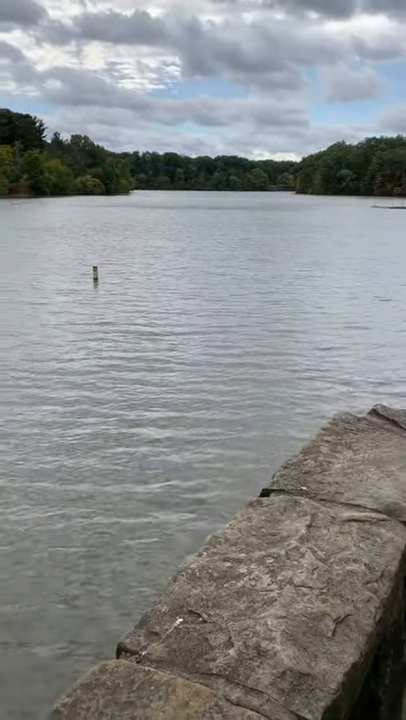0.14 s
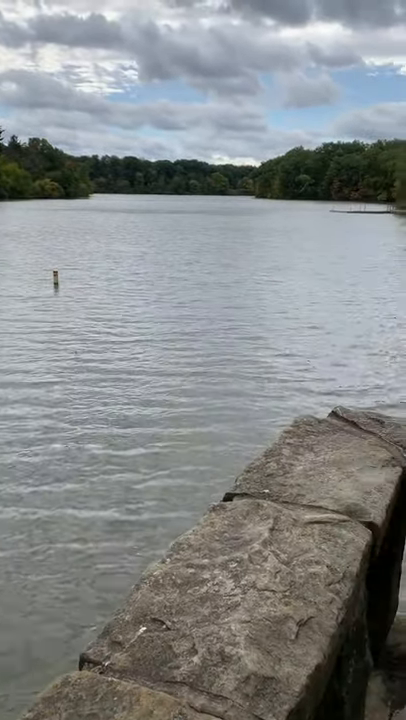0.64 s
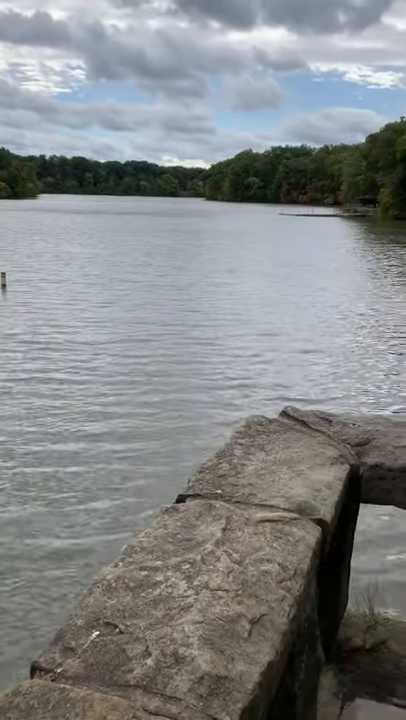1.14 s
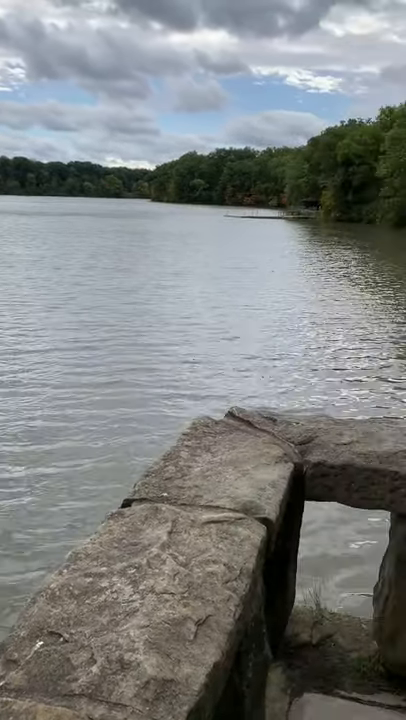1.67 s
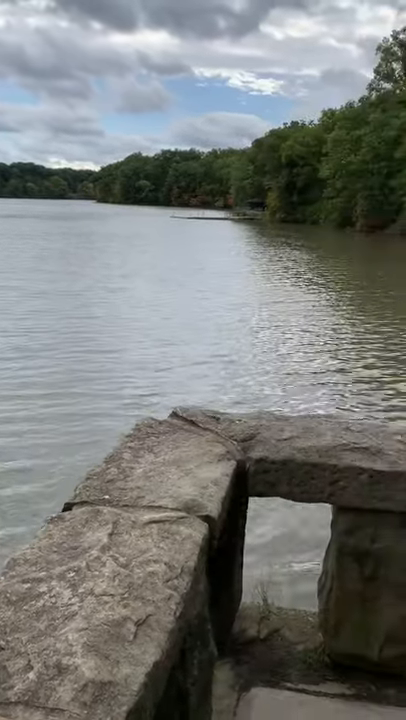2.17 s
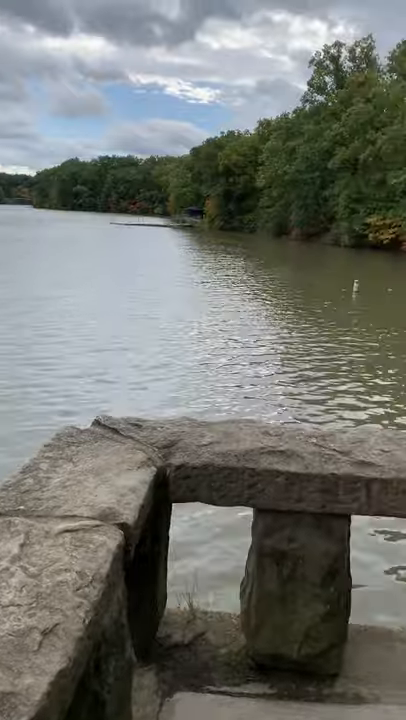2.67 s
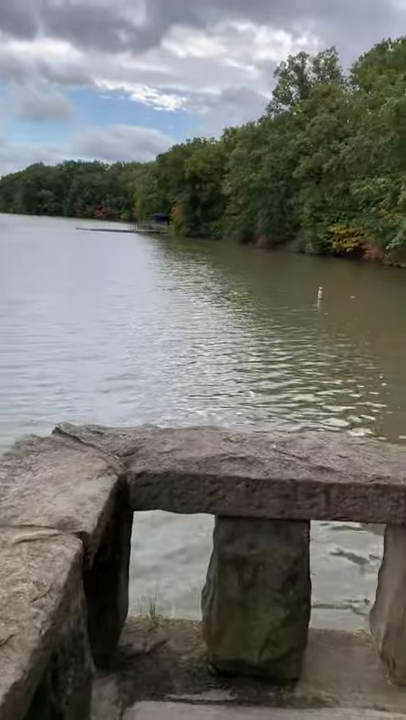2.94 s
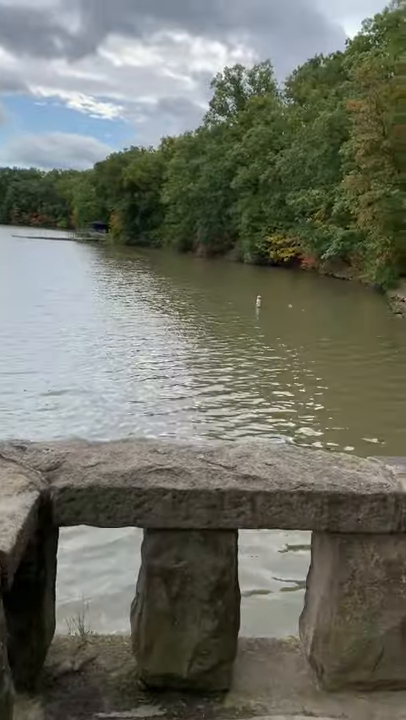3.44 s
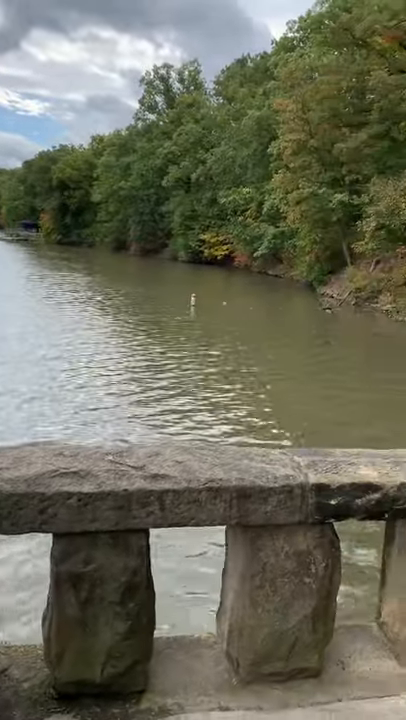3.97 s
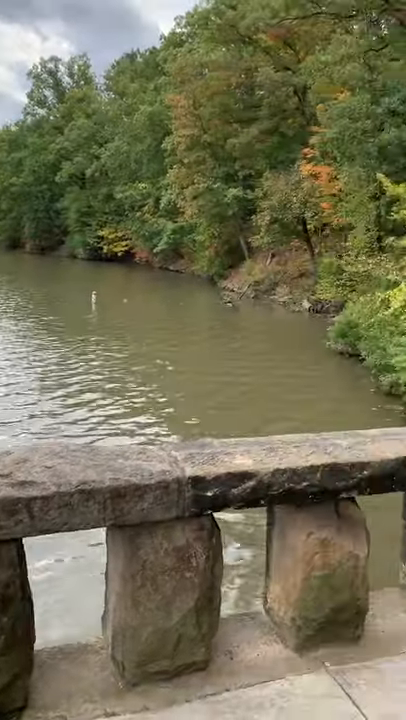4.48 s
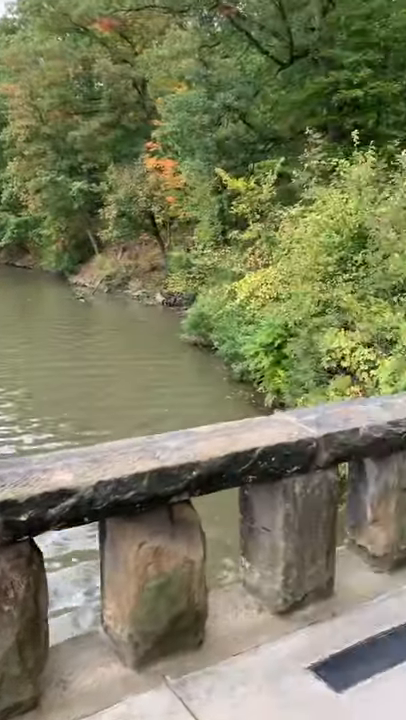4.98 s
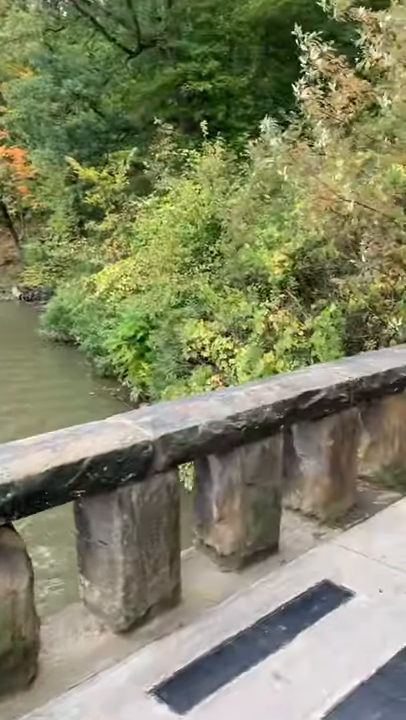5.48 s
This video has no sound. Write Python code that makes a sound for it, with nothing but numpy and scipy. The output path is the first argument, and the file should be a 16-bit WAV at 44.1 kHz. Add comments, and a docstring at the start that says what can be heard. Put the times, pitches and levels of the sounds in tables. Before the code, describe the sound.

A steady rush of water falling down a stepped stone dam, some way off beside a lake, fills all of about 5.6 seconds. It is dense, smooth noise with faint shifting patches and no separate splashes. For the first second it is bright and hissy; from about 1 to 3.5 seconds the handheld stereo microphone turns away and the rush becomes duller, lower and wider, leaning slightly left in the mids. After 4.5 seconds it grows a little quieter and regains some brightness. Light wind buffets the microphone throughout: low rumble and flutter, strongest near 1.5 seconds, dipping briefly around 2.2, returning by 2.5 and rising again after 5.2. Short, soft, deep thumps sagging in pitch come irregularly, clearer around 0.35, 1.2, 2.6 and 2.8 seconds, with a close cluster from 5.2 to 5.6. The wind shifts between left and right; the rush continues to the end.

```python
"""Water pours down a stepped stone dam some way off, heard through the two microphone ports of a hand-held camera.
The rush is noise shaped in pitch and time; as the camera turns away it gets duller, quieter and wider.
Wind buffets the ports: slow and light rumbles of noise swell and fade, some moving the ports in opposite senses.
The clearest gusts thump: short low swings that sag in pitch."""
import sys
import numpy as np
from scipy import signal
from scipy.fft import rfft, irfft, next_fast_len
from scipy.io import wavfile
from scipy.ndimage import uniform_filter1d, map_coordinates

SR = 44100
rng = np.random.default_rng(int(sys.argv[2]) if len(sys.argv) > 2 else 0)


def voltage_ratio(level):
    """Linear amplitude factor for a level in decibels (scalar or array-like)."""
    return 10 ** (np.asarray(level, float) / 20)


def pcm_store(signal):
    """Save signal as 16-bit PCM."""
    levels = np.round(np.clip(np.atleast_2d(signal), -1, 1) * 32767)
    wavfile.write(sys.argv[1], SR, levels.astype(np.int16).T)


N = 247842  # length in samples

# brief dips of the low rush and the wind flutter; only the rush obeys below_hz:
# middle_s, depth_db, half_length_s (to 1/e), below_hz
DIPS = [(2.23, -10, .05, 200), (2.293, -11, 0.023, 480), (2.474, -12, 0.03, 450)]


def unit(x):
    """Scales a sound to an average strength (rms) of 1."""
    return x / np.sqrt(np.mean(x ** 2) + 1e-20)


def along(rows, hz):
    """Reads the columns of a table at the pitches hz, on a log pitch axis."""
    row_hz, *columns = np.transpose(rows)
    return [np.interp(np.log(hz + 1), np.log(row_hz + 1), column) for column in columns]


def curves(rows, t):
    """Reads the columns of a table at the times t."""
    row_s, *columns = np.transpose(rows)
    return [np.interp(t, row_s, column) for column in columns]


def wobble(rate):
    """A smooth curve through random points, rate points a second."""
    points = rng.standard_normal(int(N * rate / SR) + 4)
    return map_coordinates(points, [np.arange(N) * rate / SR])


def coloured(spectrum):
    """Steady noise of rms 1, made stronger or weaker at each pitch as the spectrum says."""
    m = next_fast_len(N + SR // 4)
    gain = voltage_ratio(along(spectrum, np.fft.rfftfreq(m, 1 / SR))[0])
    noise = irfft(rfft(rng.standard_normal(m)) * gain, m)
    return unit(noise[:N])


def wind():
    """A lumpy buffet and a lighter flutter common to both ports; cross flow moves them in opposite senses."""
    # strength of the wind at the ports: time_s, buffet_db, flutter_db, cross_flow_db
    strength = [(0, -40, -39, -45), (.12, -32.5, -36.5, -36), (.35, -33.5, -37.5, -30), (.5, -37, -37, -37),
                (.9, -36, -35.5, -41), (1.1, -36, -37, -39), (1.26, -32, -33, -32), (1.44, -34, -43, -36),
                (1.53, -27.5, -25, -29), (1.65, -32, -35.5, -37), (1.9, -38, -42.5, -40),
                (2.05, -33, -34, -43), (2.22, -45, -48, -42), (2.5, -31, -35.5, -33),
                (2.7, -37, -34.5, -39), (2.93, -31.5, -37, -45), (3.15, -34.5, -37.5, -30),
                (3.6, -37, -40.5, -38), (3.82, -35.5, -46, -28.5), (4.0, -33, -41, -38),
                (4.17, -32.5, -40.5, -29), (4.4, -36, -37.5, -40), (4.6, -36, -34, -28),
                (4.9, -43, -37, -45), (5.3, -34, -30.5, -32), (5.62, -30.5, -37.5, -39)]
    # colours of the three kinds of wind noise, only the shape counts: pitch_hz, level_db (per Hz)
    buffet_colour = [(15, -37), (30, -6), (55, 7.5), (90, 0), (140, -7.5), (250, -29), (1500, -120)]
    # the same columns: pitch_hz, level_db (per Hz)
    flutter_colour = [(60, -16), (130, 2), (220, -1), (350, -10), (700, -27), (3000, -120)]
    # the same columns: pitch_hz, level_db (per Hz)
    cross_colour = [(15, -20), (35, -5), (70, -2), (130, -1.5), (250, -9), (500, -23), (900, -38),
                    (3000, -120)]

    t = np.arange(N) / SR
    buffet_db, flutter_db, cross_db = curves(strength, t)
    dips_db = sum(db * np.exp(-((t - s) / length) ** 2) for s, db, length, _ in DIPS)
    # random swells: a slower and a quicker wobble in dB added together
    buffet_swell = voltage_ratio(1.6 * wobble(7.1) + 1.1 * wobble(25))
    flutter_swell = voltage_ratio(1.5 * wobble(9) + 2.15 * wobble(30))
    cross_swell = voltage_ratio(1.2 * wobble(9) + 2.9 * wobble(21.95))
    buffet = voltage_ratio(buffet_db) * unit(buffet_swell * coloured(buffet_colour))
    flutter = voltage_ratio(flutter_db + dips_db) * unit(flutter_swell * coloured(flutter_colour))
    cross = voltage_ratio(cross_db) * unit(cross_swell * coloured(cross_colour))
    return buffet + flutter + cross * [[1], [-1]]


def thumps():
    """Each gust front pushes the membranes in a short low swing, the pitch sagging as it passes."""
    # the clearest gust thumps; level is the top of the envelope before the left-right lean:
    # peak_s, level_db, pitch_hz (at the peak), half_length_ms (to 1/e)
    gusts = [(0.152, -17.3, 69.4, 12), (0.191, -21, 68, 9.9), (0.349, -15, 104, 3.7), (0.989, -18, 90, 4.5),
             (1.156, -22.5, 62, 7.6), (1.222, -13, 134, 3), (1.285, -20, 85, 6.9), (1.316, -17.3, 76, 15),
             (1.51, -19, 108, 14), (1.544, -20, 211, 7), (1.602, -18.5, 95, 5.1), (1.726, -21, 69.5, 8.7),
             (2.045, -22.3, 55, 24.6), (2.624, -14, 88.5, 6.8), (2.82, -16, 63, 12.6),
             (3.035, -17, 66, 7.8), (3.508, -23.8, 86, 15), (3.786, -17.5, 120, 11.5),
             (4.049, -17.8, 75, 3.7), (4.085, -21.5, 93.5, 14), (4.166, -22.8, 75, 16),
             (4.404, -18, 97, 15), (4.489, -23, 113, 15), (4.553, -20.5, 89, 13), (4.693, -25, 67, 28),
             (5.022, -22, 75, 7.7), (5.107, -22.8, 58.4, 13.9), (5.239, -18, 83, 7.9), (5.315, -15, 94, 10),
             (5.395, -13.3, 58.5, 13), (5.465, -25, 88, 17), (5.588, -19, 77.4, 6.5)]
    sag = 6.5  # the pitch falls at twice this share of its peak value per second
    lean_db = .8  # most that one port gains and the other loses

    out = np.zeros((2, N + SR))
    t = np.arange(-SR // 10, SR // 10) / SR  # seconds from the peak
    chances = rng.uniform(-1, 1, (len(gusts), 2))
    for (s, db, hz, ms), (phase, lean) in zip(gusts, chances):
        swing = np.cos(2 * np.pi * hz * t * (1 - sag * t) + np.pi * phase)
        push = voltage_ratio(db) * np.exp(-(t * 10 ** 3 / ms) ** 2) * swing
        out[:, round(s * SR):][:, :len(t)] += push * voltage_ratio([[lean_db * lean], [-lean_db * lean]])
    return out[:, SR // 10:][:, :N]  # cuts the lead-in, so peaks fall on time


def blend(facing, away, share):
    """Mixes two pitch curves by a share that changes in time: 0 is facing, 1 is turned away."""
    return facing[:, None] + (away - facing)[:, None] * share


def waterfall():
    """Countless far splashes merge into noise with faint patches; the turn blends colour and stereo image."""
    # the turn of the camera: time_s, turned_away (0-1), rush_db
    camera_turn = [(0, 0, -26), (.5, 0, -26.5), (1, 0.1, -26), (1.5, 0.25, -26.5), (2, 0.51, -25),
                   (2.5, 0.5, -26), (3, 0.64, -26), (3.5, 0.89, -26), (4, 0.88, -26.5), (4.5, 0.88, -27),
                   (5, 0.66, -28.5), (5.62, 0.52, -29)]
    # colour of the falling water, relative levels: pitch_hz, facing_db (per Hz), away_db (per Hz)
    water_colour = [(22, -33, -35), (55, -20, 8), (120, -32, -9), (200, -13.5, -9), (380, -2.5, -5),
                    (616, -5.5, -3.5), (1250, -3.5, -6.5), (2100, -6.5, -8.5), (2590, -9.5, -11),
                    (3940, -5.5, -14), (5800, -8, -15.5), (7450, -11, -19.5), (7770, -12.5, -21),
                    (9320, -16, -22), (11900, -21.5, -30), (15200, -25.5, -33), (16000, -37, -37)]
    # how the two ports differ: pitch_hz, likeness_facing (0-1), likeness_away (0-1),
    # left_lead (half cycles), left_over_right_facing_db, left_over_right_away_db
    port_pair = [(60, .85, .85, 0, 0, 0), (300, .4, .3, 0, .9, .7), (700, .82, .38, 0, 1.3, 4.2),
                 (1050, .97, .38, 0, .4, 3.6), (1450, .99, .38, 0, .1, 3), (1900, .55, .35, .2, .9, 3.2),
                 (2300, .62, .4, .15, -.9, 1.4), (2900, .36, .1, .4, -.5, .4),
                 (3600, .65, .45, .55, .4, .5), (4050, .7, .7, .78, .3, .2), (4270, 1, 1, 1, 0, 0),
                 (5020, 1, 1, 1, 0, 0), (5300, .75, .7, 1.22, .3, 0), (5800, .65, .62, 1.55, .3, 0),
                 (6150, .72, .74, 1.8, 0, 0), (6400, 1, 1, 2, 0, 0), (7050, 1, 1, 2, 0, 0),
                 (7400, .82, .86, 2.07, 0, 0), (7720, .58, .54, 2.33, 0, 0)]
    repeat_hz = 7620  # from 100 Hz above this, likeness and lead are read again this much lower
    patchy_db = 1.01  # typical size of the random patches
    hop = 256  # samples from one short spectrum to the next

    # two independent noises as short spectra: rows are pitches, columns are times
    hz, t, (noise_a, noise_b) = signal.stft(rng.standard_normal((2, N)), SR, nperseg=2 * hop)
    turn, rush_db = curves(camera_turn, t)

    # level at every pitch and time; the facing colour sets the scale of both
    facing_db, away_db = along(water_colour, hz)
    scale_db = 10 * np.log10(np.mean(voltage_ratio(2 * facing_db)))
    colour_db = blend(facing_db - scale_db, away_db - scale_db, turn)
    patches = uniform_filter1d(rng.standard_normal(noise_a.shape), size=8, axis=0)
    patches = unit(uniform_filter1d(patches, size=12, axis=1))
    dips_db = sum(db * np.exp(-((t - s) / length) ** 2) * (hz < below_hz)[:, None]
                  for s, db, length, below_hz in DIPS)
    level = voltage_ratio(dips_db + rush_db + colour_db + patchy_db * patches)

    # likeness, lead and tilt of the ports
    repeats = hz > repeat_hz + 100
    like, like_away, lead, tilt_db, tilt_away_db = along(port_pair, np.where(repeats, hz - repeat_hz, hz))
    lead = np.where(repeats, lead + 2, lead)  # a full cycle on
    top = hz > 13900  # the highest treble is centred
    like, like_away = np.where(top, 1, [like, like_away])
    lead = np.where(top, 4, lead)
    wide = np.clip(1.6 * turn - .15, 0, 1)  # the direct path is lost early in the turn
    # part of the treble is made less alike, most of all when facing the water
    blur = ((hz > 10500) & (hz < 13600))[:, None] * (.27 - .14 * wide)
    likeness = np.clip(blend(like, like_away, wide) * (1 - blur), 0, 1)
    tilt_db = blend(tilt_db, tilt_away_db, wide) * (hz <= repeat_hz)[:, None]  # no tilt higher up

    # a shared noise, plus a second one added left and taken away right
    angle = np.arccos(likeness) / 2
    shared = np.cos(angle) * noise_a
    apart = np.sin(angle) * noise_b
    shift = voltage_ratio(tilt_db / 2) * np.exp(.5j * np.pi * lead)[:, None]
    pair = [(shared + apart) * shift, (shared - apart) / shift]
    return signal.istft(level * pair, SR, nperseg=2 * hop)[1][:, :N]


def scene():
    """Wind, thumps and water added together at the two ports."""
    return wind() + thumps() + waterfall()


def band_limit(x):
    """A steep low-pass at the top of the band."""
    return signal.sosfilt(signal.butter(12, 15910, fs=SR, output="sos"), x)


def record(dry):
    """The microphones lose the deepest bass, below about 32 Hz."""
    bass_cut = signal.butter(2, 32, "high", fs=SR, output="sos")
    mix = signal.sosfilt(bass_cut, dry)
    return band_limit(mix)


dry = scene()
out = record(dry)
pcm_store(out)
```